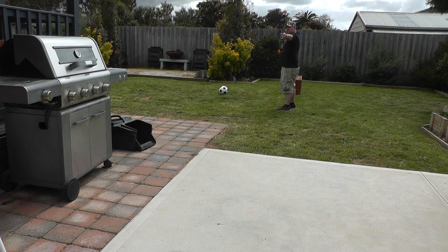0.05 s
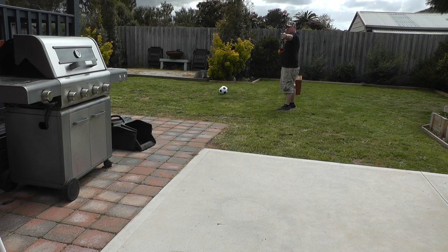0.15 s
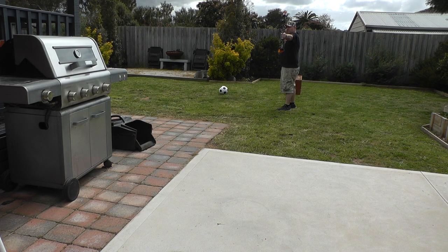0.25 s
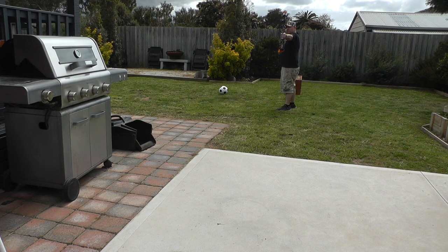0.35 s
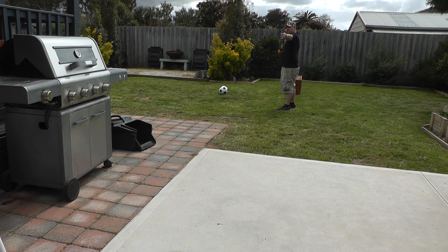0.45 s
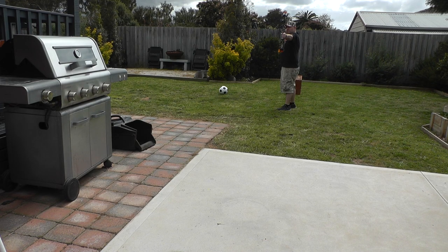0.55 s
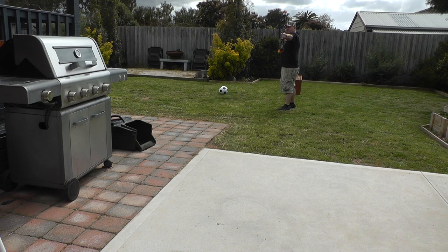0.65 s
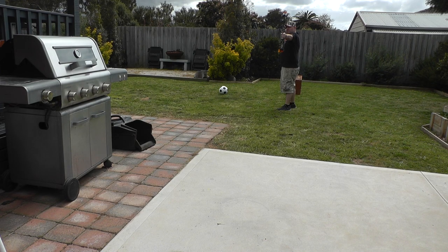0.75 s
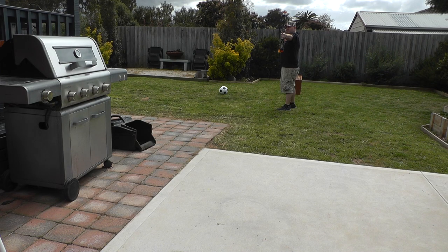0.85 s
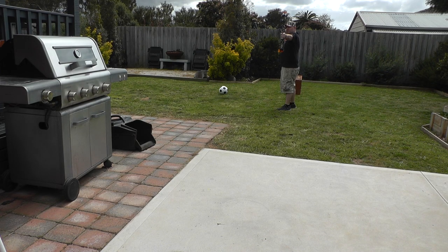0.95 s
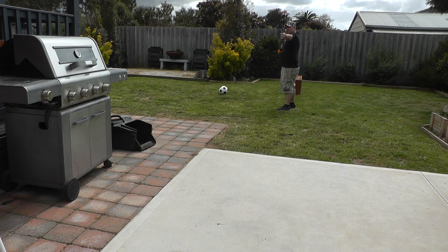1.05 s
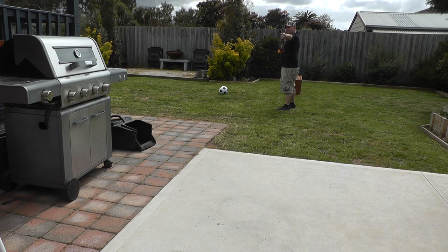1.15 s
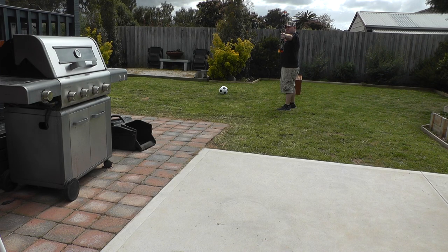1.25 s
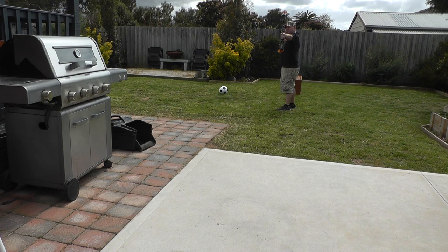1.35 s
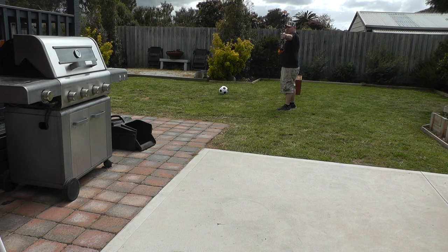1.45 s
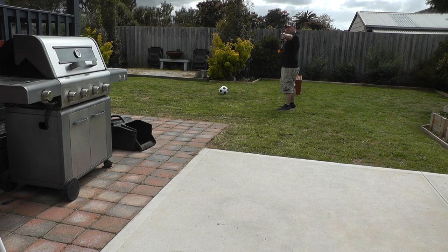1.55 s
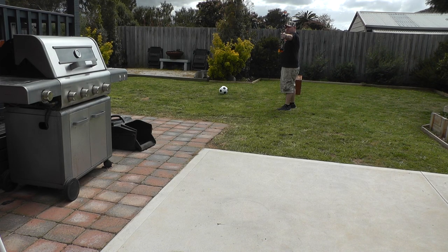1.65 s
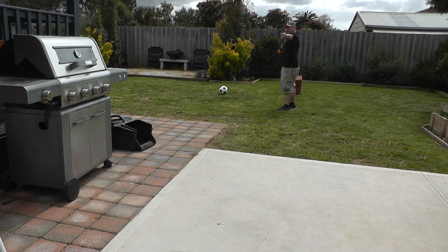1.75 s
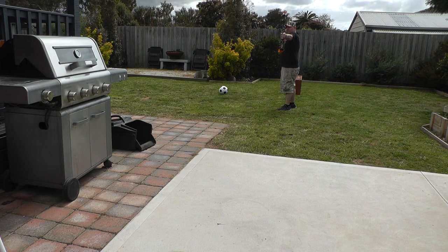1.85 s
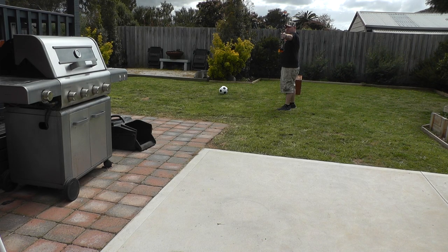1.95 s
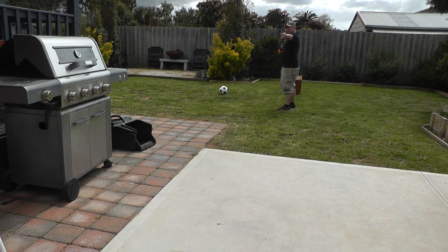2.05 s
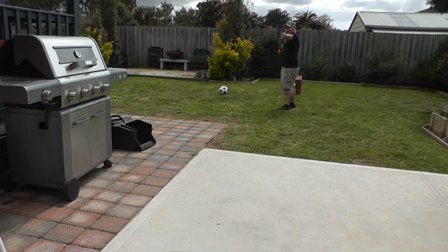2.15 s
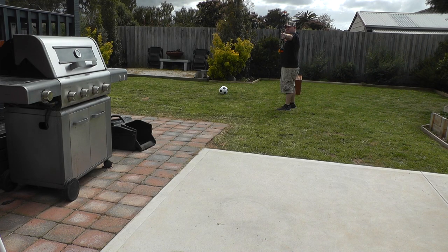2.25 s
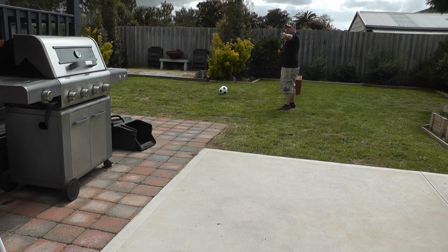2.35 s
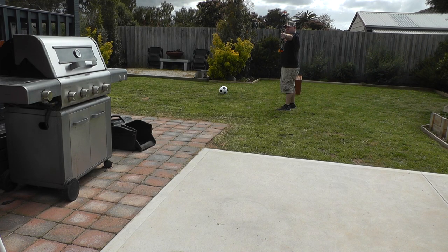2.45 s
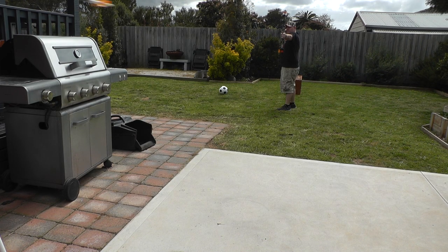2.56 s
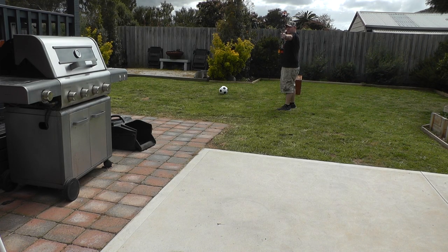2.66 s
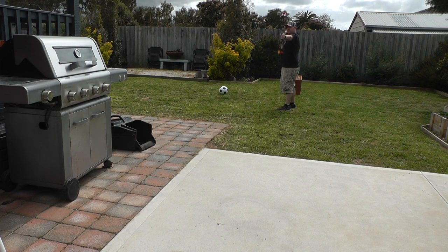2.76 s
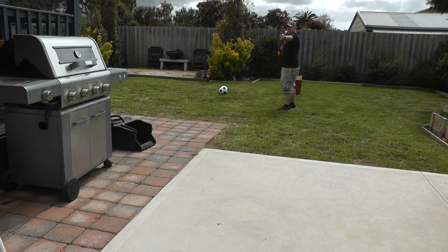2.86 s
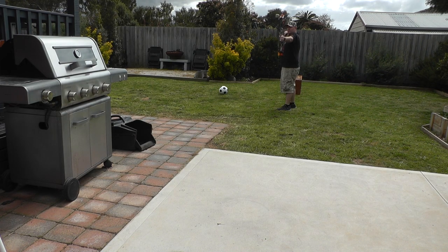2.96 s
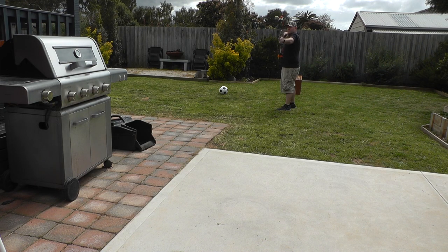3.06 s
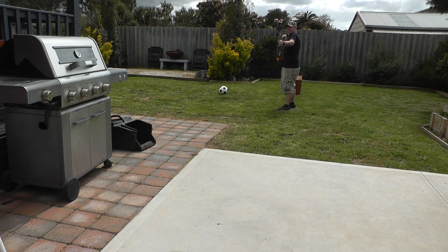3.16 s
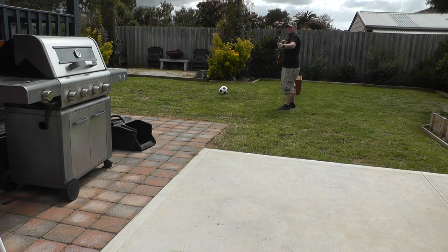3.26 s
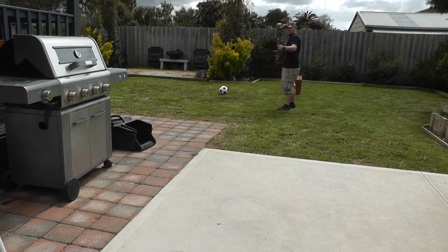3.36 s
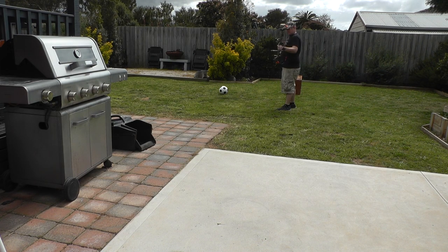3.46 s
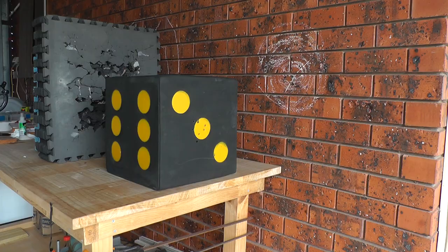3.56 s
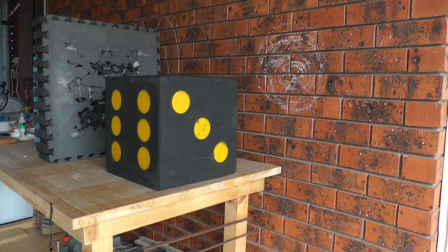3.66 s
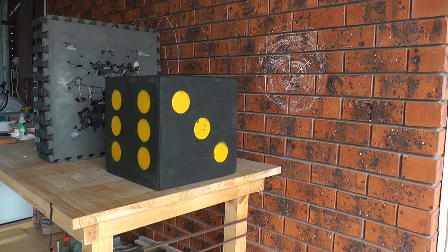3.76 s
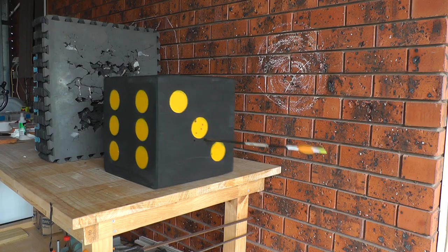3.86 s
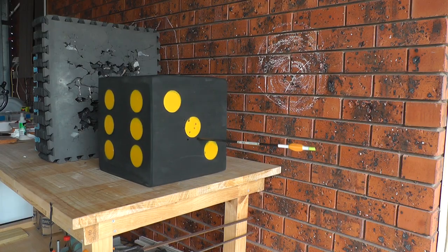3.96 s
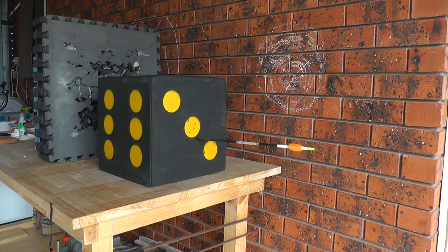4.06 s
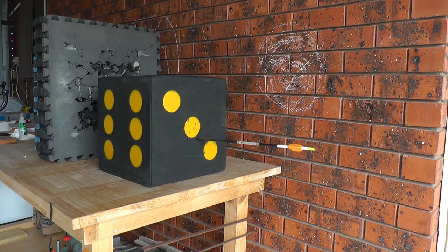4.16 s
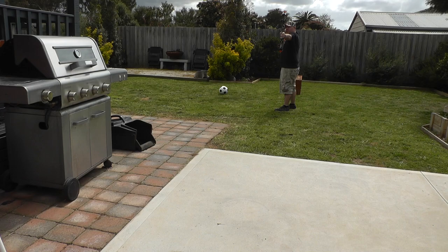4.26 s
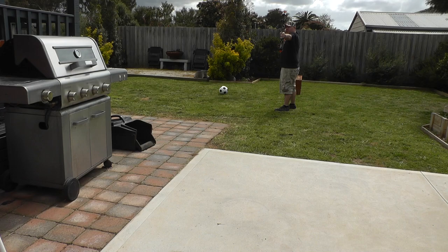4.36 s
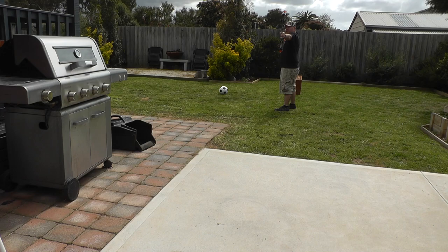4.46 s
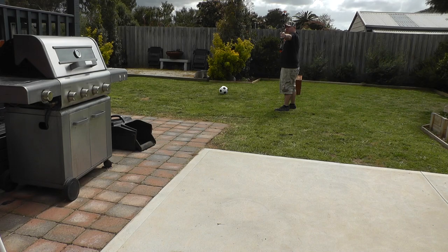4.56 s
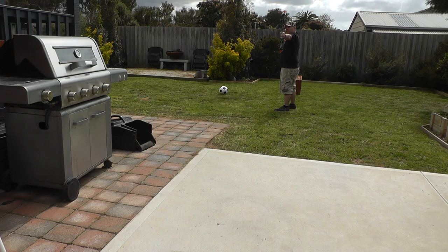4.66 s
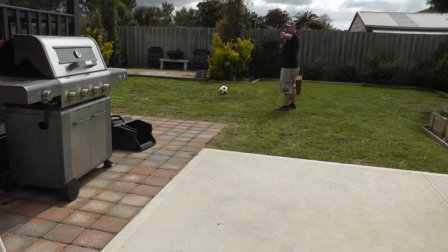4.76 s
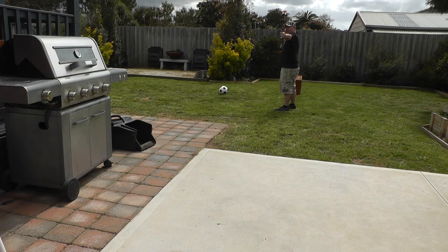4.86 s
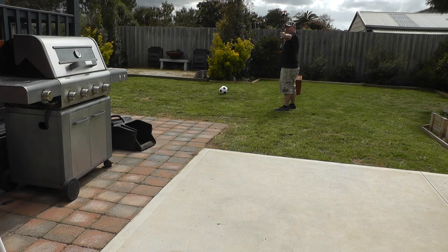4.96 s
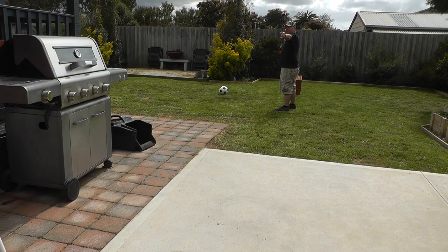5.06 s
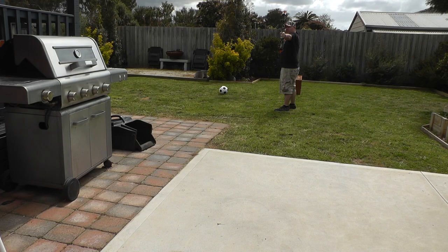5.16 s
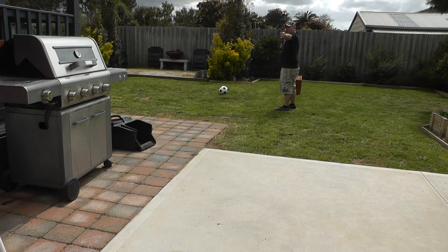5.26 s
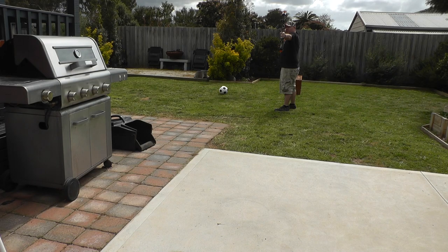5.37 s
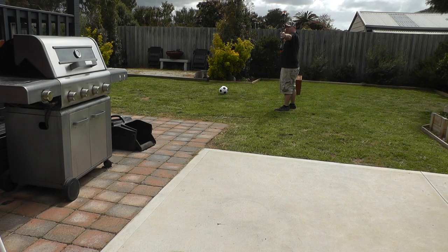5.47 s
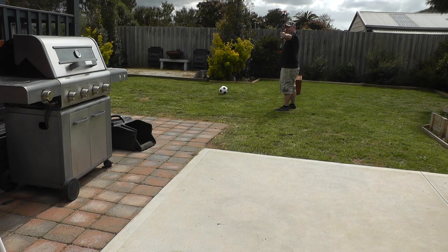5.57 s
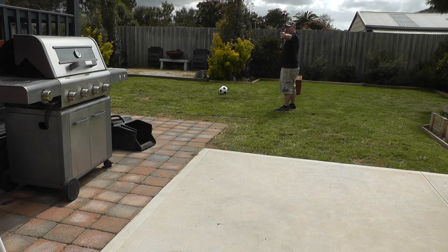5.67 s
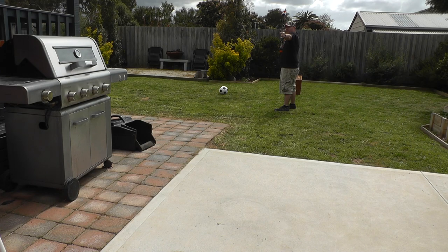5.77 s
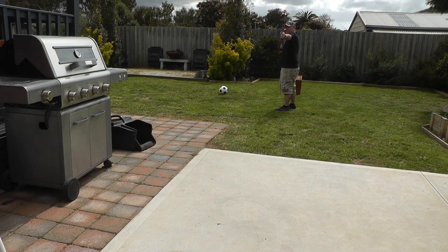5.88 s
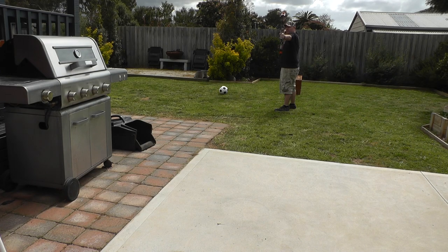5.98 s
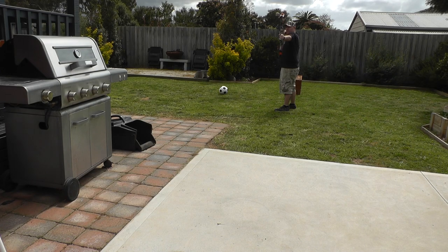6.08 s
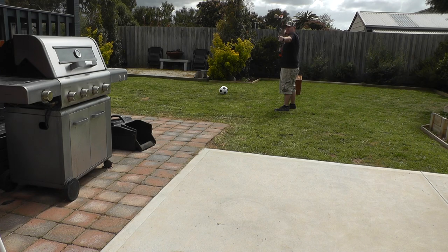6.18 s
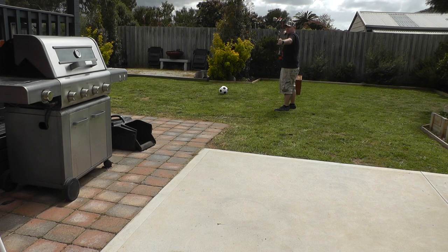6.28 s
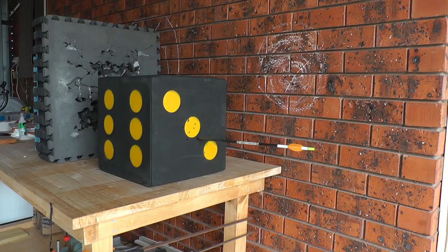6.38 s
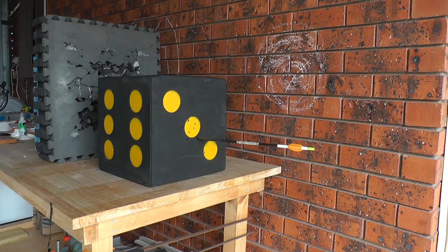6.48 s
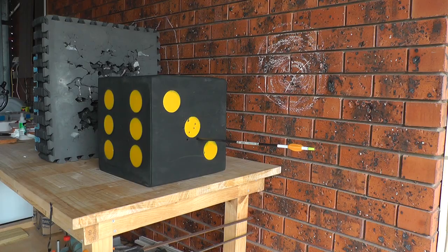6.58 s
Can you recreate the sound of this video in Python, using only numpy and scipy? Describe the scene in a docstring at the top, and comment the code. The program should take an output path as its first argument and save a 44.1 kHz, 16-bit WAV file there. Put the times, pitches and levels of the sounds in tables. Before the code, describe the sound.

A quiet fenced backyard: soft, low distant traffic, a barely audible high whine, and tiny bird chirps around 1.0-1.2 and 1.8 seconds. A faint dull tick comes at 2.25. At 2.58 a compound bow fires with a brief whir and hard dry slap, ringing off nearby surfaces; the arrow hisses past at 2.65 and a hollow thud answers from the porch at 2.74, its echoes fading within half a second. At 3.64 the sound cuts beside the foam block: a distant, rounded string at 3.81, rising hiss, then at 3.92 a massive overloaded crack and boxy ringing thud. The lawn returns at 4.29, with soft bird whistles from 4.6 to 5.4 and ticks at 4.97 and 5.72. A second slap at 5.88, hiss at 5.94 and boomier, rattling thud at 6.03 follow. At 6.42 it cuts to the porch; the far string sounds at 6.55, ending before any hit.

```python
"""Bow shots into a foam block

A compound bow is shot across a fenced lawn into a foam block under a brick-walled porch.
The lawn microphone twice hears the string (a pressure pulse and its echoes), the arrow hissing past (shaped
noise) and the far thud (echoes through resonances). Cuts go to a microphone beside the block: first the
far-off string and a hit that overloads it, later a string alone. Far traffic (noise in bands) lies under
everything; the lawn also has small birds (unsteady sines), dull ticks and a thin whine."""
import sys
import numpy as np
from scipy import signal
from scipy.io import wavfile
from scipy.ndimage import uniform_filter1d

SR = 44100
rng = np.random.default_rng(int(sys.argv[2]) if len(sys.argv) > 2 else 0)


def volts_from_decibels(level):
    """Turn decibel levels (scalar or array-like) into linear amplitude factors."""
    exponent = np.asarray(level, float) / 20
    return 10 ** exponent


def wav_out(sig):
    """Save sig, one row per channel (or a flat mono array), as 16-bit PCM at SR to the path in sys.argv[1]."""
    wavfile.write(sys.argv[1], SR, np.round(np.clip(np.atleast_2d(sig).T, -1, 1) * 32767).astype(np.int16))


N = 291942  # length in samples

# Spans heard from beside the block. Each row: start in seconds, end in seconds, fade in seconds.
CUTS = [(3.635, 4.287, 0.0048), (6.415, 6.7, 0.00083)]
# Dying away of echoes under the porch. Each row: frequency in Hz, time to fall 60 dB in seconds.
PORCH_DECAY = [(100, 0.64), (500, 0.66), (2500, 0.64), (5000, 0.46), (8000, .4), (11000, 0.31),
               (15000, .27)]
# Ringing of foam block, table and shaft. Each row: frequency in Hz, relative level in dB,
# time to fall 60 dB in seconds.
BLOCK_MODES = [(240, -2.5, .1), (415.5, 1, 0.12), (470, -11.5, .12), (574, -3, .14), (605, -7, .1),
               (797, -7.5, .1), (894, 0.5, .08), (957, 0.5, .08)]
# Ringing of the bow. Each row: frequency in Hz, relative level in dB, time to fall 60 dB in seconds.
BOW_RINGS = [(1180, -5, .02), (6000, -3.5, .003), (8600, -1, .002)]


def rms_one(x):
    """Scale to unit rms."""
    return x / np.sqrt(np.mean(x ** 2) + 1e-20)


def at_hz(points, hz):
    """Read a table on a log-frequency axis."""
    table = np.array(points)
    return np.interp(np.log(hz), np.log(table[:, 0]), table[:, 1])


def add(out, sound, s):
    """Mix a sound in at a time in seconds."""
    i = round(s * SR)
    out[i:i + len(sound)] += sound[:N - i]


def bands(source, spectrum):
    """Third-octave bands drawn in turn from a pair of sources, which may be the same, each at its dB per Hz."""
    edges = 25 * 2 ** np.arange(0, 9.5, 1 / 3)
    for k, (low, high) in enumerate(zip(edges, edges[1:])):
        hz = np.sqrt(low * high)
        sos = signal.butter(2, [low, high], "band", fs=SR, output="sos")
        sign = (-1) ** k  # alternate signs keep the seams filled
        yield hz, sign * volts_from_decibels(at_hz(spectrum, hz)) * signal.sosfilt(sos, source[k % 2])


def ring(x, hz, t60):
    """One resonance with gain 1 at its peak, falling 60 dB in t60 seconds."""
    r = volts_from_decibels(-60 / (max(t60, .002) * SR))
    w = 2 * np.pi * hz / SR
    return signal.lfilter(np.array([1, 0, -1]) * (1 - r * r) / 2, [1, -2 * r * np.cos(w), r * r], x)


def traffic(spectrum, patchy_db, size=N):
    """Far tyre roar at unit rms: noise in bands, each wavering in level by about patchy_db."""
    out = np.zeros(size)
    for hz, band in bands(rng.standard_normal((2, size)), spectrum):
        steps = rng.standard_normal(60)
        waver = np.interp(np.arange(size), np.linspace(0, N, len(steps)), steps)
        out += band * volts_from_decibels(patchy_db * waver)
    return rms_one(out)


def whine():
    """A thin tone at the top of the hearing range that wavers in level."""
    # Each row: frequency in Hz, mean level in dB rms ahead of the treble cut.
    whine_tone = [(15622, -94)]
    (hz, db), = whine_tone
    waver = np.interp(np.arange(N), np.linspace(0, N, 200), rng.standard_normal(200))
    return np.sqrt(2) * volts_from_decibels(db + 1.5 * waver) * np.sin(2 * np.pi * hz * np.arange(N) / SR)


def ticks():
    """Short dull puffs of dying noise in a middle band."""
    # Faint dry ticks. Each row: start in seconds, level in dB of the noise ahead of its band filter.
    faint_ticks = [(2.25, -66), (4.97, -54.5), (5.72, -69)]
    out = np.zeros(N)
    t = np.arange(round(.06 * SR)) / SR
    sos = signal.butter(1, [1800, 7000], "band", fs=SR, output="sos")
    for s, db in faint_ticks:
        puff = rng.standard_normal(len(t)) * volts_from_decibels(db - 60 * t / 0.12)
        add(out, signal.sosfilt(sos, puff), s)
    return out


def whistle(out, s, length, start_hz, middle_hz, end_hz, db, waver):
    """One sine note that swells and fades, its pitch unsteady by the fraction waver (rms)."""
    u = np.linspace(0, 1, round(length * SR))
    hz = np.interp(u, [0, .5, 1], [start_hz, middle_hz, end_hz])
    hz = hz * (1 + waver * rms_one(uniform_filter1d(rng.standard_normal(len(u)), size=60)))
    swell = np.sin(np.pi * u) ** .7
    note = np.zeros(N)
    add(note, np.sqrt(2) * volts_from_decibels(db) * np.sin(np.cumsum(2 * np.pi * hz / SR)) * swell, s)
    return out + note


def birds():
    """Slightly unsteady whistled notes with a blur of garden echoes."""
    # Levels are of the dry note at the top of its swell.
    # A far bird's held notes. Each row: start in seconds, length in seconds, pitch in Hz, level in dB rms.
    warble = [(4.6, .07, 2600, -69), (4.62, .05, 4200, -75), (4.675, .09, 1300, -51),
              (4.93, .05, 1700, -59), (5.0, .045, 2620, -64), (5.03, .05, 1970, -59.5),
              (5.04, .04, 1700, -61), (5.12, .04, 2550, -66), (4.83, .05, 2840, -72),
              (5.15, .04, 1750, -62), (5.16, .04, 1960, -58), (5.295, .08, 4220, -68),
              (5.3, .04, 1950, -61), (5.3, .07, 3950, -71)]
    # Falling chirps. Each row: start in seconds, length in seconds, first pitch in Hz, last pitch in Hz,
    # level in dB rms.
    falls = [(1.03, .03, 3600, 3400, -72), (1.125, .025, 3200, 2700, -72), (1.82, .08, 3800, 3100, -70)]
    # Chirps that arch up and down. Each row: start in seconds, length in seconds, pitch of both ends in Hz,
    # top pitch in Hz, level in dB rms.
    arches = [(1.098, .062, 6800, 7900, -59), (5.335, .08, 2780, 3750, -67)]
    whistle_waver, arch_waver = .011, .04  # fractions of the pitch
    out = np.zeros(N)
    for s, length, hz, db in warble:
        out = whistle(out, s, length, hz, hz, hz, db, whistle_waver)
    for s, length, start_hz, end_hz, db in falls:
        out = whistle(out, s, length, start_hz, (start_hz + end_hz) / 2, end_hz, db, whistle_waver)
    for s, length, ends_hz, top_hz, db in arches:
        out = whistle(out, s, length, ends_hz, top_hz, ends_hz, db, arch_waver)
    t = np.arange(round(.4 * SR)) / SR
    blur = rng.standard_normal(len(t)) * volts_from_decibels(-60 * t / .4)
    echoes = signal.fftconvolve(out, blur / np.linalg.norm(blur))[:N]
    return out + volts_from_decibels(-5.0) * echoes


def string_onset(t, whir_s, whir_db, first_db, build_s):
    """The cams whir faintly ahead of time 0; then the echoes build up from first_db."""
    whir = volts_from_decibels(whir_db) * np.clip((t + whir_s) / .003 + 1, 0, 1)
    build_up = volts_from_decibels(first_db * np.exp(-np.maximum(t, 0) / build_s))
    return np.where(t < 0, whir, build_up)


def hit_onset(t, knock_db, knock_s, first_db, build_s):
    """A short direct knock, overtaken by the echoes that build up from first_db."""
    late = np.maximum(t, 0)
    knock = volts_from_decibels(knock_db) * np.exp(-(late / knock_s) ** 4)
    build_up = volts_from_decibels(first_db * np.exp(-late / build_s))
    return np.hypot(knock, build_up) * (t >= 0)


def scattered(out, s, db, onset, spectrum, decay, per_s, modes, modes_db):
    """A blow returns as uneven echoes, per_s a second at first, that thicken and die band by band."""
    lead = .03  # seconds kept free ahead of the blow
    t = np.arange(round(.75 * SR)) / SR - lead
    late = np.maximum(t, 0)
    sizes = volts_from_decibels(2.43 * np.minimum(rng.exponential(1, len(t)), 5)) * rng.choice([-1, 1], len(t))
    # chance of an echo at each sample; rare echoes are made larger to hold the power even
    share = np.clip(per_s * (1 + late / .03) / SR, 1e-4, 1)
    echoes = sizes * (rng.random(len(t)) < share) / np.sqrt(share)
    parts = list(bands([echoes, echoes], spectrum))
    height = np.sqrt(np.mean(sum(band for hz, band in parts) ** 2))
    sound = sum(band * volts_from_decibels(-60 * late / max(at_hz(decay, hz), .03)) for hz, band in parts) / height
    sound = sound * onset(t)
    body = sum(volts_from_decibels(mode_db) * ring(sound, hz, t60) for hz, mode_db, t60 in modes)
    add(out, volts_from_decibels(db) * (sound + volts_from_decibels(modes_db) * body), s - lead)


def far_string(out):
    """The string from beside the block: a brief, very faint whir, then echoes that build up under the porch."""
    # Each row: time in seconds, level in dB.
    block_strings = [(3.811, -19), (6.545, -19)]
    # Colour of the string across the lawn. Each row: frequency in Hz, relative level in dB per Hz.
    far_string_colour = [(35, -40.5), (60, -8.5), (145, -20), (259, -3), (334, -11.5), (411, 5.5),
                         (483, -8.5), (769, -4), (904, -7.5), (1540, -15), (1690, -14), (3990, -23.5),
                         (5910, -19.5), (15300, -42.5)]
    for s, db in block_strings:
        scattered(out, s, db,
                  lambda t: string_onset(t, whir_s=.012, whir_db=-35, first_db=-15, build_s=.02),
                  far_string_colour, PORCH_DECAY, per_s=5000.0, modes=BOW_RINGS, modes_db=-3.0)


def far_hits(out):
    """The thud from the lawn: a knock, then porch echoes that ring block, shaft and table."""
    # Each row: time in seconds, level in dB, relative shaft rattle in dB, relative table boom in dB.
    thuds = [(2.7385, -10, -28, 1), (6.0347, -13, 6.5, 10)]
    # Colour of the far thud. Each row: frequency in Hz, relative level in dB per Hz.
    hit_colour = [(35, -49), (60, -15.5), (166, -13.5), (375, -3), (685, -7), (751, -2), (843, -13),
                  (925, -5), (992, -11.5), (1310, -12), (1650, -12.5), (4910, -23.5), (15300, -38)]
    for s, db, rattle_db, boom_db in thuds:
        rattle = (3500, rattle_db, .0035)  # Hz, dB, seconds to fall 60 dB
        boom = (125, boom_db, .15)
        scattered(out, s, db,
                  lambda t: hit_onset(t, knock_db=-3, knock_s=.003, first_db=-25, build_s=.005),
                  hit_colour, PORCH_DECAY, per_s=3500.0, modes=BLOCK_MODES + [rattle, boom], modes_db=-2.5)


def arrow(out, s, hiss_db, rise_s, fall_s, puff_db=-93.0):
    """The vanes hiss loudest at the closest point; the pushed air thumps the microphone."""
    # Colour of the vanes. Each row: frequency in Hz, relative level in dB per Hz.
    fletching = [(500, -1), (1500, -1.5), (4000, 1), (9000, -5), (16000, -21.5)]
    t = np.arange(-round(.1 * SR), round(.1 * SR)) / SR
    hiss = rms_one(sum(band for hz, band in bands(rng.standard_normal((2, len(t))), fletching)))
    nearness = 1 / (1 + (t / np.where(t < 0, rise_s, fall_s)) ** 2)
    width = t / .005
    puff = -width * np.exp(-width ** 2 / 2)
    add(out, volts_from_decibels(hiss_db) * hiss * nearness * np.hanning(len(t)) + volts_from_decibels(puff_db) * puff, s + t[0])


def passing_arrows(out):
    """The arrows fly past the lawn microphone: a quick rise and fall of hiss with an air thump."""
    # Each row: time in seconds, hiss in dB rms at the closest point, scale of the air puff in dB.
    passes = [(2.646, -18.5, -28), (5.939, -22, -20.5)]
    for s, hiss_db, puff_db in passes:
        arrow(out, s, hiss_db, rise_s=.008, fall_s=.007, puff_db=puff_db)


def crack(out, s, crack_db, crack_hz, crack_t60, thud_db, thud_hz, thud_t60):
    """The point pierces the skin of the block with a short bright ring while the foam thuds."""
    t = np.arange(round(.1 * SR)) / SR
    bright = volts_from_decibels(crack_db - 60 * t / crack_t60) * np.sin(2 * np.pi * crack_hz * t)
    thud = volts_from_decibels(thud_db - 60 * t / thud_t60) * np.cos(2 * np.pi * thud_hz * t)
    add(out, bright + thud, s)


def near_hit(out):
    """An arrow arrives beside the microphone: rising hiss, crack, and the block ringing with porch echoes."""
    # Colour of the hit close by. Each row: frequency in Hz, relative level in dB per Hz.
    near_hit_colour = [(35, -49.5), (60, -18), (358, -11.5), (441, -7), (518, -15), (596, -1.5),
                       (883, -19.5), (969, -7), (1040, -16), (2510, -27), (2750, -23), (5780, -34),
                       (8370, -37), (15300, -56.5)]
    s = 3.9247
    arrow(out, s, hiss_db=-21.5, rise_s=.011, fall_s=.001)
    scattered(out, s, -3,
              lambda t: hit_onset(t, knock_db=0, knock_s=.011, first_db=-5, build_s=.08),
              near_hit_colour, PORCH_DECAY, per_s=5000.0, modes=BLOCK_MODES, modes_db=1.5)
    crack(out, s, crack_db=24.0, crack_hz=2400, crack_t60=.0035, thud_db=11.0, thud_hz=440, thud_t60=.045)


def slap(out, s, db):
    """The string stops dead: one short pressure pulse with an undershoot, repeated by near surfaces."""
    # Slap repeated by ground, fence and wall. Each row: delay in seconds, relative level in dB.
    slap_echoes = [(0, 0), (.0016, -6), (.0041, -6.5), (.0117, -3.5), (.0130, -6.5)]
    clicks = np.zeros(round(.05 * SR))
    for delay, echo_db in slap_echoes:
        add(clicks, np.array([volts_from_decibels(echo_db)]), delay)
    pulse = np.hanning(round(0.00054 * SR)) ** .6
    high_pass = signal.butter(1, 330, "high", fs=SR, output="sos")  # gives the undershoot
    add(out, volts_from_decibels(db) * signal.sosfilt(high_pass, np.convolve(clicks, pulse)), s - .0001)


def near_string(out):
    """The string on the lawn: cam whir, hard slap, and lawn echoes coloured by the ringing bow."""
    # Each row: time in seconds, height of the slap's pulse in dB ahead of its high-pass.
    slaps = [(2.5843, 1), (5.879, 0)]
    # Colour of the string's echoes. Each row: frequency in Hz, relative level in dB per Hz.
    string_colour = [(35, -37), (60, -5), (215, -8.5), (734, -2), (1540, -8.5), (1770, -7.5), (2180, -11),
                     (2390, -8), (2820, -11.5), (3090, -10.5), (8770, -19.5), (11100, -29), (15300, -32)]
    # Dying away of echoes on the lawn. Each row: frequency in Hz, time to fall 60 dB in seconds.
    lawn_decay = [(100, 0.56), (500, 0.49), (2000, 0.44), (6000, 0.42), (10000, 0.41), (15000, 0.46)]
    echo_db, sets_in_s = -19, .0018  # against the slap; ahead of the slap
    for s, db in slaps:
        slap(out, s, db)
        scattered(out, s - sets_in_s, db + echo_db,
                  lambda t: string_onset(t, whir_s=.017, whir_db=-21, first_db=-5, build_s=.006),
                  string_colour, lawn_decay, per_s=5000.0, modes=BOW_RINGS, modes_db=-4.0)


def overload(x):
    """The input stage clips; the gain is then pulled down and the zero line sags until it recovers."""
    ease_db, attack_s, release_s = -3.5, 0.0014, 0.66
    sag, recover_s = 0.19, .025
    slow_sag, slow_recover_s = .015, 0.56
    clipped = np.clip(x, -1, 1)
    t = np.arange(N) / SR
    over = (abs(x) > 1) * 1.
    # jumps to 1 at each overload, then falls in a straight line to 0
    held = np.maximum(np.maximum.accumulate(over + t / release_s) - t / release_s, 0)
    a = np.exp(-1 / (attack_s * SR))
    gain = volts_from_decibels(ease_db * signal.lfilter([1 - a], [1, -a], held))

    def drift(seconds):
        return signal.lfilter([1 / (0.0088 * SR)], [1, -np.exp(-1 / (seconds * SR))], over)

    return 0.98 * gain * clipped - sag * drift(recover_s) - slow_sag * drift(slow_recover_s)


def lawn():
    """What the lawn microphone hears: garden background, near string, passing arrow, far thud."""
    # Level of the traffic over time. Each row: time in seconds, level in dB rms.
    traffic_db = [(0, -49.7), (4.3, -49.5), (5.2, -48), (5.8, -48.5), (6.62, -45)]
    # Colour of the traffic on the lawn. Each row: frequency in Hz, relative level in dB per Hz.
    traffic_colour = [(15, -38), (25, -3), (59, 1), (141, -3.5), (170, 0.5), (317, -6.5), (344, -0.5),
                      (416, -15.5), (451, -3), (624, -3.5), (1040, 1.5), (2800, -22), (5730, -33.5),
                      (7710, -33), (9070, -39), (16000, -46)]
    s, db = np.transpose(traffic_db)
    roar = volts_from_decibels(np.interp(np.arange(N) / SR, s, db)) * traffic(traffic_colour, patchy_db=1.0)
    out = roar + birds() + ticks() + whine()
    near_string(out)
    passing_arrows(out)
    far_hits(out)
    return out


def beside_block():
    """What the microphone at the block hears, through its overloaded input."""
    # Colour of the traffic under the porch. Each row: frequency in Hz, relative level in dB per Hz.
    porch_traffic = [(15, -43), (25, -12), (64, -7.5), (363, -8), (405, -1.5), (463, -15), (624, -4),
                     (754, -6), (1740, -14.5), (2910, -33), (16000, -49)]
    out = np.zeros(N)
    for start, end, fade in CUTS:
        roar = traffic(porch_traffic, patchy_db=0.5, size=round((end - start) * SR))
        add(out, volts_from_decibels(-46.5) * roar, start)
    far_string(out)
    near_hit(out)
    return overload(out)


def scene():
    """Each cut fades one microphone out, then the other in."""
    t = np.arange(N) / SR
    inside = np.max([np.minimum(t - start, end - t) / fade for start, end, fade in CUTS], axis=0)
    mix = np.clip(-inside, 0, 1) * lawn() + np.clip(inside, 0, 1) * beside_block()
    return mix[None]


def low_pass(x):
    """Removes everything above the highest recorded frequency."""
    return signal.sosfilt(signal.butter(12, 21850, fs=SR, output="sos"), x)


def record(dry):
    """The top is cut, 45 dB down from 16 kHz, and full scale clips."""
    treble_cut = signal.cheby2(16, 45, 16000, fs=SR, output="sos")
    finished = np.clip(signal.sosfilt(treble_cut, dry), -1, 1)
    return low_pass(finished)


dry = scene()
out = record(dry)
wav_out(out)
```